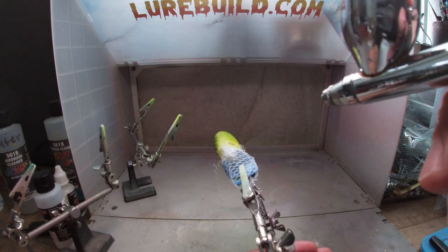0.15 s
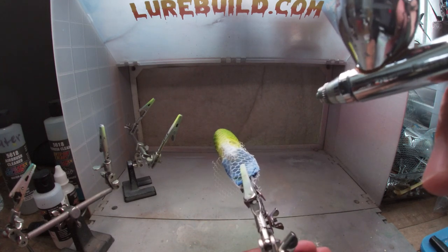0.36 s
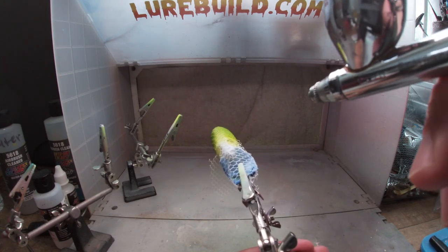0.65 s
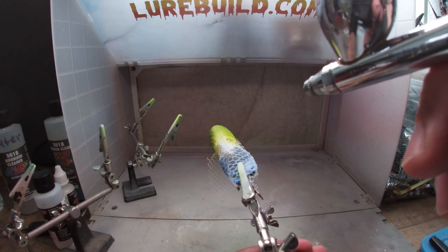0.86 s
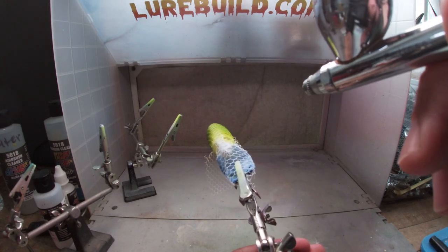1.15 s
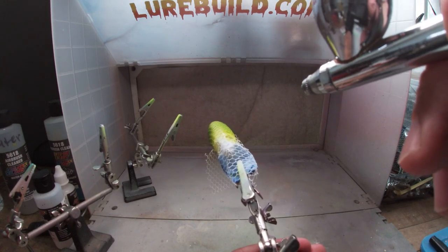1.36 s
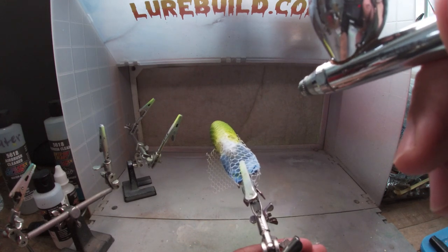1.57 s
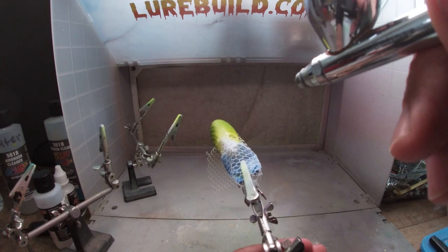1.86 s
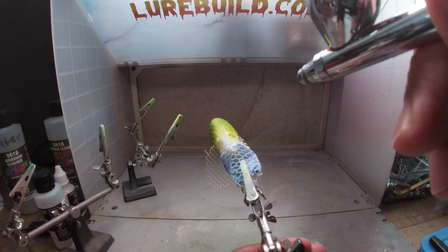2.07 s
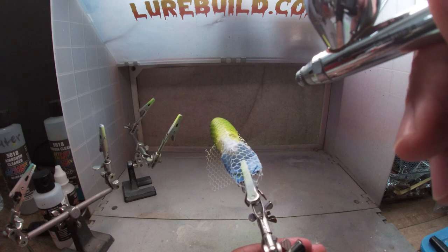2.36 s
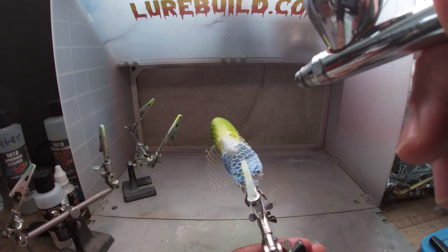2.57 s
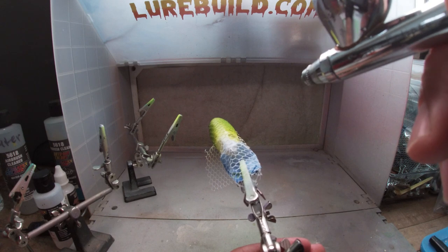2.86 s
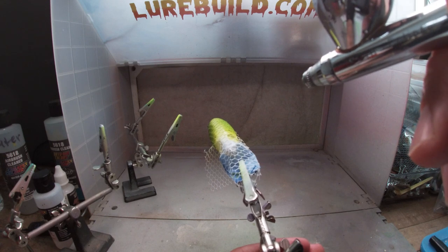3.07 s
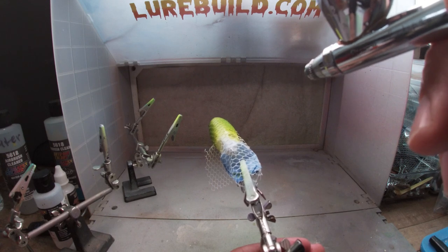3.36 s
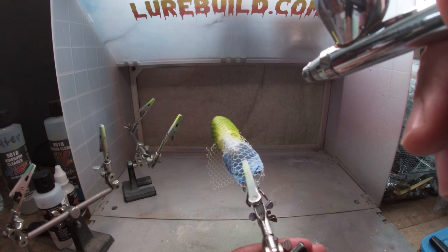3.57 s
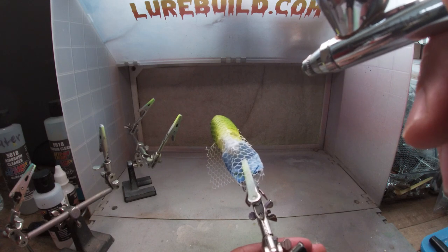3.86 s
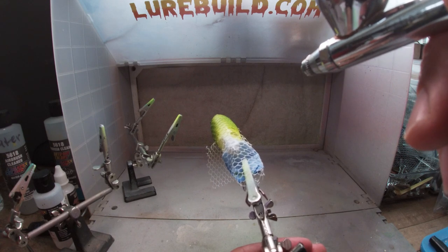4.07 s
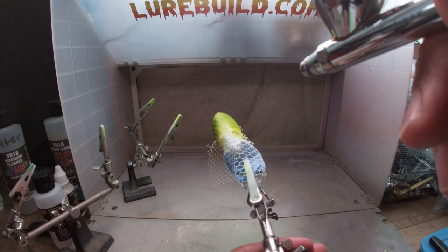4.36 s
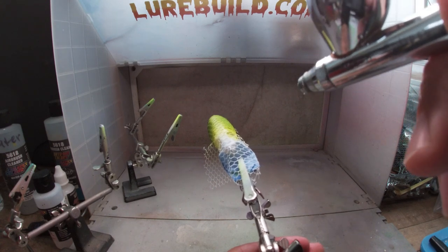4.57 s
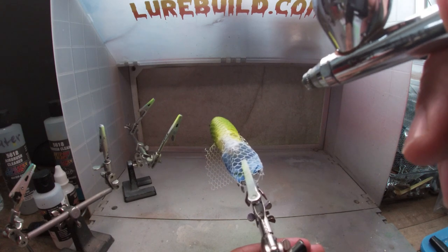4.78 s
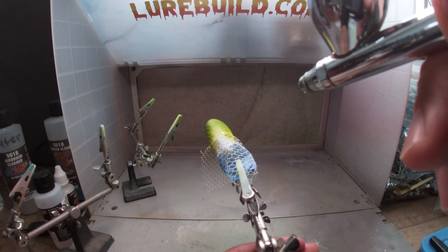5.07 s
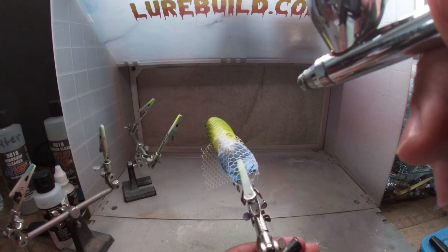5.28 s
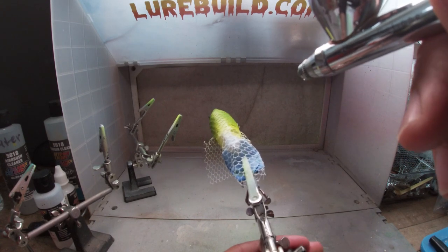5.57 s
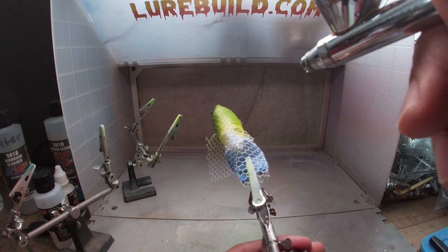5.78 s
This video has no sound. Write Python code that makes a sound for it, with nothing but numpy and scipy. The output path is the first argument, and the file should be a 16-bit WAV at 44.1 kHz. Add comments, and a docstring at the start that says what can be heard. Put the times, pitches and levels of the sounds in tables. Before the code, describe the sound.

An airbrush starts with a soft hiss and a small trigger click. A pressure switch snaps, and a small piston air compressor starts up, straining briefly before settling into a loud, low, rapidly pulsing hum with a light valve clatter. The hiss weakens beneath it and flares faintly in short spurts. One microphone picks it all up in a small spray booth in a quiet workshop.

```python
"""A small spray booth in a quiet workshop, heard on one microphone with the walls close by.
An airbrush hisses; the pressure switch snaps and a piston compressor starts. Its shaft lines beat
nine times a second against the motor's magnetic hum, while the valves clatter on every turn.
The air jet weakens as the pressure settles, and flares when the trigger is worked."""
import sys
import numpy as np
from scipy import signal
from scipy.fft import rfft, irfft
from scipy.io import wavfile

SR = 44100
rng = np.random.default_rng(int(sys.argv[2]) if len(sys.argv) > 2 else 0)


def wav_record(signal):
    """Record a signal, one row per channel, as 16-bit PCM in the file named by sys.argv[1]."""
    frames = np.transpose(np.atleast_2d(signal))
    bounded = np.clip(frames, -1, 1)
    # unit amplitude maps onto the largest positive 16-bit level
    quanta = np.round(bounded * 32767).astype(np.int16)
    wavfile.write(sys.argv[1], SR, quanta)


N = 261380
TIME, BINS = np.arange(N) / SR, np.fft.rfftfreq(N, 1 / SR)

# The shaft under load. Each row: time in seconds, turns a second.
SHAFT_SPEED = [(.76, 4), (.88, 27.74), (1.5, 27.742), (3, 27.728), (4.5, 27.712), (5.9, 27.703)]
# The piston's thump. Each row: multiple of the shaft speed, settled level in dB rms.
PISTON_LINES = [(1, -61), (2, -40), (3, -19.7), (4, -31), (5, -39), (6, -52), (7, -45), (8, -59), (9, -47),
                (10, -50), (11, -47.5), (12, -62), (13, -60), (16, -62), (17, -63), (18, -56), (21, -56),
                (22, -64), (23, -54), (24, -56), (25, -63), (30, -57), (32, -56)]
# Motor hum chopped by the load. Each row: shaft multiple added to the hum, settled level in dB rms.
HUM_SIDEBANDS = [(-38, -54), (-7, -50), (-2, -42), (-1, -23.7), (0, -40), (1, -45), (2, -50), (3, -47),
                 (4, -57), (5, -52), (6, -61), (7, -56), (8, -58), (26, -57)]
OVERTONE_SIDEBANDS = [(-5, -86), (-4, -42.5), (-3, -67), (-2, -53), (-1, -47.5), (2, -50.5)]  # around twice the hum frequency
# Valve clacks in one turn. Each row: share of the turn, relative level in dB, brightness from 0 to 1.
VALVE_CLACKS = [(.425, -3.5, .9), (.56, -32, 0.3), (.65, 2.5, 0.1), (.75, 7.5, 0), (0.848, -1.5, 0.6)]
# Pulls on the trigger. Each row: start, length and rise in seconds, relative whistle level in dB,
# lift of the jet in dB.
TRIGGER_PULLS = [(0.183, 0.051, .02, -41, 2), (0.334, .43, .08, -50.5, 0.5), (0.789, 0.64, .05, -45.5, 0.9),
                 (1.45, 0.38, 0.039, -48, 1), (1.8, 0.83, 0.21, -46, 0.5), (2.607, .8, 0.2, -47, 1.3),
                 (3.406, 0.15, .05, -43.5, 3), (3.667, 0.13, 0.095, -42, 3), (3.992, 0.048, 0.022, -45, 4),
                 (4.2, 0.48, 0.051, -47, 1.4), (4.838, .065, .025, -43, 3.5), (5.138, 0.043, .02, -44, 3),
                 (5.34, .06, 0.024, -44, 2.5), (5.578, .06, .025, -44, 2), (5.83, 0.076, 0.03, -43, 3.7)]

# Broad spectra of the sources. Each row: frequency in Hz, relative level in dB.
COVER_SPECTRUM = [(300, -32), (680, -25), (780, -9), (835, -3), (880, -6), (928, 0), (1000, -16),
                  (1130, -2), (1230, -16), (1600, -20), (2600, -26), (5000, -38), (15000, -70)]  # the valve cover under each clack
HOUSING_SPECTRUM = [(40, -28), (90, -1.5), (150, 10.5), (200, -3.5), (330, 1.5), (420, -1.5), (530, -5),
                    (640, -7), (740, -4.5), (820, -2.5), (930, 3), (990, -3), (1130, -4.5), (1250, -4.5),
                    (1700, -7.5), (2600, -14), (5000, -33), (15000, -65)]  # the pump housing
MOTOR_BUZZ_SPECTRUM = [(500, -31), (630, 2), (740, -18), (840, -6), (915, 4.5), (1000, -20), (1100, -15),
                       (1400, -33), (1750, -22), (2300, -39)]
JET_SPECTRUM = [(250, -21), (500, -13.5), (1100, -12.5), (1300, -9), (2000, -5), (3100, -5.5), (4000, -3.5),
                (6400, -6), (8400, -3.5), (10300, -3.5), (11500, -9), (13600, -14), (14600, -20),
                (15700, -33)]
NOZZLE_SPECTRUM = [(6500, -41), (7200, -4), (7450, -6.5), (7750, -3), (8200, -1), (8750, -3.5),
                   (9100, -12.5), (9500, -51.5)]
TRIGGER_SPECTRUM = [(200, -13), (700, -8), (2800, -3), (8000, -7), (11000, -9), (15000, -29)]
SWITCH_SPECTRUM = [(500, -20.5), (3500, -42), (4900, -10), (6300, -31), (7600, -6), (8600, 4), (9500, -17),
                   (12500, -24), (15500, -31)]
ROOM_SPECTRUM = [(20, -12), (60, -3.5), (120, -9), (195, 0), (300, -2.5), (450, -22), (1000, -21.5),
                 (2400, -18.5), (3500, -33), (8000, -28), (15000, -60)]

# Narrow resonances. Each row: centre in Hz, width in Hz, boost or cut in dB.
CYLINDER_HEAD_RINGS = [(1324, 44, 2), (1510, 26, 5), (1696, 100, 7), (2103, 66, 9)]
AIR_CAP_RINGS = [(1297, 94, 8.5), (4360, 85, 0.5), (4790, 230, -3.5), (5120, 200, 4), (5470, 69, 2),
                 (5936, 110, 6.5), (6330, 550, 4), (7340, 150, 3.5), (7700, 100, -2), (9330, 240, -8.5),
                 (10130, 500, 3.5), (11100, 300, -4), (11900, 400, -3.5)]
TRIGGER_RINGS = [(3370, 66, 13.5)]
BOOTH_RINGS = [(197, 42, 7)]

HUM_HZ, SHAFT_HZ = 119.94, SHAFT_SPEED[-1][1]
HUM_CREST_S, STROKE_S = 1.9969, 1.9853  # a hum cycle and a shaft turn begin at these times
SWITCH_ON_S, BREAKS_FREE_S = 0.76, 0.8215  # the motor stalls between these times


def compressor(strain_until_s=0.97, thump_delay_s=0.02):
    """The motor breaks free and drives the pump, which strains while it catches up, then settles."""
    turns = np.cumsum(np.interp(TIME, *np.transpose(SHAFT_SPEED))) / SR
    turns -= np.interp(STROKE_S, TIME, turns)
    hum_cycles = HUM_HZ * (TIME - HUM_CREST_S)
    strain = envelope(BREAKS_FREE_S, strain_until_s - BREAKS_FREE_S, rise_s=0.25, release_s=0.3)
    drone_gain = ramp(BREAKS_FREE_S + thump_delay_s, rise_s=0.051) * amp(1.8 * strain)
    clatter_gain = ramp(BREAKS_FREE_S, rise_s=0.012) * amp(4 * strain)
    return inrush() + drone_gain * drone(turns, hum_cycles) + clatter_gain * clatter(turns, hum_cycles)


def drone(turns, hum_cycles, boom_hz=90, boom_width_hz=20, knock_lead_s=0.00326, scatter_hz=300):
    """Shaft lines and hum sidebands; the strongest two lie 9 Hz apart and throb."""
    lines = np.zeros(N)
    for hum_multiple, rows in enumerate([PISTON_LINES, HUM_SIDEBANDS, OVERTONE_SIDEBANDS]):
        for shaft_multiple, db in rows:
            hz = abs(shaft_multiple * SHAFT_HZ + hum_multiple * HUM_HZ)
            lag = -np.angle(1 + 7 / (1 + 2j * (hz - boom_hz) / boom_width_hz))  # the body booms late
            if hum_multiple == 0:
                lag -= 2 * np.pi * knock_lead_s * max(hz - 111, 0)  # the knock comes ahead of the boom
            if hum_multiple == 2:
                lag += 2 * np.pi * 0.51  # the overtone opposes the hum and rounds its crests
            lag += (hz / scatter_hz) ** 2 * rng.standard_normal()  # reflections scramble high lines
            phase = 2 * np.pi * (shaft_multiple * turns + hum_multiple * hum_cycles)
            lines += amp(db) * np.cos(phase - lag)
    return np.sqrt(2) * lines * (1 + 0.019 * drift(rate_hz=26))


def clatter(turns, hum_cycles, clack_db=-46, grind_db=-41, alike=0.22, jitter_turns=0.0035):
    """The cover rings with the clacks, the housing with a grinding that is partly alike on every turn."""
    turns = turns + jitter_turns * drift(rate_hz=14)
    phases = 2 * np.pi * rng.random(round(SR / SHAFT_HZ / 2))
    one_turn = unit_rms(irfft(np.exp(1j * phases)))
    repeating = one_turn[(turns % 1 * len(one_turn)).astype(int)]
    grit = np.sqrt(alike) * repeating + np.sqrt(1 - alike) * rng.standard_normal(N)
    grit *= 1 + 0.041 * np.cos(2 * np.pi * (turns - 0.6))  # loudest on the compression stroke
    chatter = booth_reflections(valve_clacks(turns, hum_cycles))
    knocking = unit_rms(colour(chatter, COVER_SPECTRUM, CYLINDER_HEAD_RINGS))
    grinding = unit_rms(colour(grit, HOUSING_SPECTRUM, CYLINDER_HEAD_RINGS))
    return amp(clack_db) * knocking + amp(grind_db) * grinding


def valve_clacks(turns, hum_cycles, uneven=0.07, crossover_hz=1080, snap_db=1):
    """Valves and piston strike at set points of each turn, harder when the motor's torque peaks."""
    torque = 1 + 0.75 * np.cos(2 * np.pi * (hum_cycles - 0.3))
    dull, bright = np.zeros(N), np.zeros(N)
    for at, db, brightness in VALVE_CLACKS:
        strikes = np.diff(np.floor(turns - at), prepend=np.floor(turns[0] - at)) > 0
        blows = strikes * amp(db) * (1 + uneven * rng.standard_normal(N))
        dull += (1 - brightness) * blows * torque
        bright += brightness * blows * amp(snap_db)
    low, high = (signal.butter(3, crossover_hz, kind, fs=SR, output="sos") for kind in ("low", "high"))
    return unit_rms(signal.sosfilt(low, dull) + signal.sosfilt(high, bright))


def inrush(growl_hz=88, growl_db=-39, buzz_db=-40, stalled_buzz_db=-53):
    """The stalled motor growls; once it turns, it buzzes until the strain is over."""
    stalled = envelope(SWITCH_ON_S, BREAKS_FREE_S - SWITCH_ON_S, rise_s=0.05, release_s=0.04)
    straining = envelope(BREAKS_FREE_S - 0.01, 0.22, rise_s=0.04, release_s=0.19)
    hum = np.sin(2 * np.pi * HUM_HZ * (TIME - HUM_CREST_S))
    growl = unit_rms(np.sin(2 * np.pi * growl_hz * TIME) + 0.41 * hum)
    buzz = unit_rms(colour(rng.standard_normal(N), MOTOR_BUZZ_SPECTRUM))
    buzz_gain = stalled * amp(stalled_buzz_db) + straining * amp(buzz_db)
    return stalled * amp(growl_db) * growl + buzz_gain * buzz


def airbrush(opens_s=0.1746, flutter=0.039, fizz_hz=11000, nozzle_db=-2.5):
    """The air valve opens: a broad jet through the air cap, and a breathy whistle at the nozzle."""
    jet_db, whistle_gain = air_flow()
    jet = unit_rms(back_wall(colour(rng.standard_normal(N), JET_SPECTRUM, AIR_CAP_RINGS)))
    fizz = irfft(rfft(jet) / (1 + (fizz_hz / (BINS + 1)) ** 20), N)
    jet += fizz * (amp(0.68 * (jet_db - jet_db.max())) - 1)  # a slower jet loses its top first
    whistle = unit_rms(back_wall(colour(rng.standard_normal(N), NOZZLE_SPECTRUM)))
    air = amp(jet_db) * jet + amp(nozzle_db) * whistle_gain * whistle
    return ramp(opens_s, rise_s=0.027) * (1 + flutter * drift(rate_hz=60)) * air


def air_flow(full_db=-42.5, working_db=-48, sag_from_s=0.95, sag_s=0.31, leak_db_per_s=0.13):
    """Jet level in dB and whistle gain: the jet sags with the line pressure; each pull lifts both."""
    excess_pressure = np.exp(-np.maximum(TIME - sag_from_s, 0) / sag_s)
    jet_db = working_db + (full_db - working_db) * excess_pressure - leak_db_per_s * TIME
    whistle_power = amp(-51.5) ** 2  # the nozzle whistles faintly between pulls
    for start_s, length_s, rise_s, whistle_db, lift_db in TRIGGER_PULLS:
        pull = envelope(start_s, length_s, rise_s, release_s=0.031)  # the trigger springs back
        jet_db += lift_db * pull
        whistle_power += (amp(whistle_db) * pull) ** 2
    return jet_db, np.sqrt(whistle_power)


def click(start_s, spectrum, rings, level_db, crack_t60, tail_db, tail_t60):
    """A small metal part snaps over: a short crack, then its ring in the booth."""
    age = np.maximum(TIME - start_s, 0)
    fade = (TIME >= start_s) * (amp(-60 * age / crack_t60) + amp(tail_db - 60 * age / tail_t60))
    return amp(level_db) * colour(fade * rng.standard_normal(N), spectrum, rings)


def back_wall(hiss, delay_s=0.00272, share=0.13):
    """The back wall returns the hiss by a path about a metre longer and ripples its spectrum."""
    return irfft(rfft(hiss) * (1 + share * np.exp(-2j * np.pi * BINS * delay_s)), N)


def booth_reflections(blows, t60=0.04):
    """Dense reflections from the close walls smear each blow into a chatter."""
    age = np.arange(SR // 10) / SR
    tail = rng.standard_normal(len(age)) * amp(-60 * age / t60)
    return blows + signal.fftconvolve(blows, tail / np.linalg.norm(tail))[:N]


def room_tone(level_db=-55):
    """The quiet workshop behind it all, with the booth's low ring."""
    return amp(level_db) * unit_rms(colour(rng.standard_normal(N), ROOM_SPECTRUM, BOOTH_RINGS))


def colour(x, spectrum, rings=()):
    """A causal filter of unit power: a broad spectrum with narrow resonances on top."""
    hz, db = np.transpose(spectrum)
    level_db = np.interp(np.log(BINS + 1), np.log(hz + 1), db)
    level_db += sum(boost / (1 + (2 * (BINS - centre) / width) ** 2) for centre, width, boost in rings)
    log_gain = np.log(unit_rms(amp(level_db)))
    response = np.exp(np.conj(signal.hilbert(np.r_[log_gain, log_gain[-2:0:-1]])))  # minimum phase
    return irfft(rfft(x) * response[:len(BINS)], N)


def ramp(start_s, rise_s):
    """A straight rise from 0 to 1."""
    return np.clip((TIME - start_s) / rise_s, 0, 1)


def envelope(start_s, length_s, rise_s, release_s):
    """A straight attack, with an exponential release once the length is up."""
    return ramp(start_s, rise_s) * np.exp(-np.maximum(TIME - start_s - length_s, 0) / release_s)


def drift(rate_hz):
    """A slow random wander of rms 1."""
    return unit_rms(irfft(rfft(rng.standard_normal(N)) * np.exp(-(BINS / rate_hz) ** 2), N))


def amp(db):
    """Decibels to gain."""
    return 10 ** (np.asarray(db) / 20)


def unit_rms(x):
    """Scales to rms 1."""
    return x / np.sqrt(np.mean(x ** 2) + 1e-20)


def scene():
    """At the microphone, in mono: compressor, airbrush, two clicks and room tone."""
    trigger = click(0.239, TRIGGER_SPECTRUM, TRIGGER_RINGS,
                    level_db=-28, crack_t60=0.011, tail_db=-15, tail_t60=0.074)
    pressure_switch = click(0.7595, SWITCH_SPECTRUM, rings=(),
                            level_db=-13.5, crack_t60=0.0092, tail_db=-22.5, tail_t60=0.21)
    room = room_tone()
    return (compressor() + airbrush() + trigger + pressure_switch + room)[None]


def record(dry):
    """The recorder's band limit cuts the top above 15.7 kHz."""
    lowpass = signal.firwin(611, 15700, window=("kaiser", 9), fs=SR)
    return signal.oaconvolve(dry, lowpass[None], "same")


dry = scene()
out = record(dry)
wav_record(out)
```